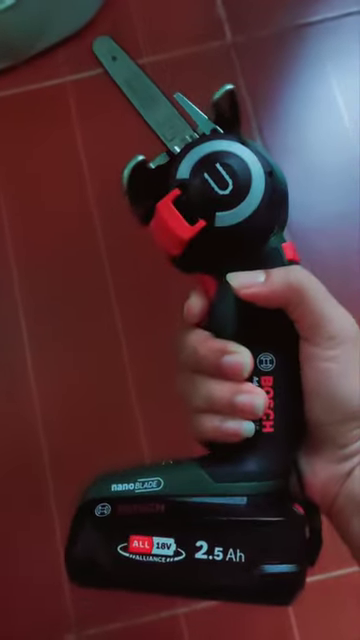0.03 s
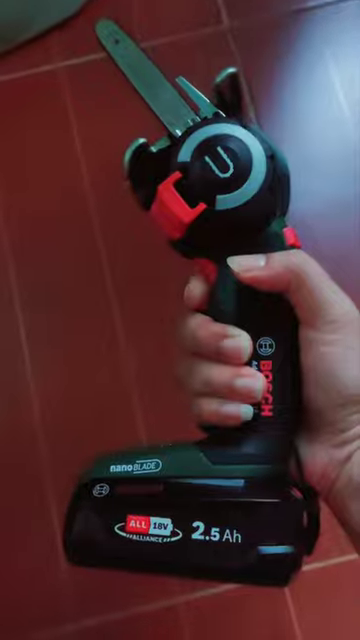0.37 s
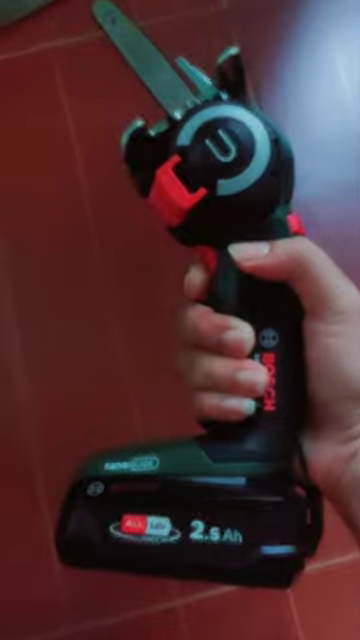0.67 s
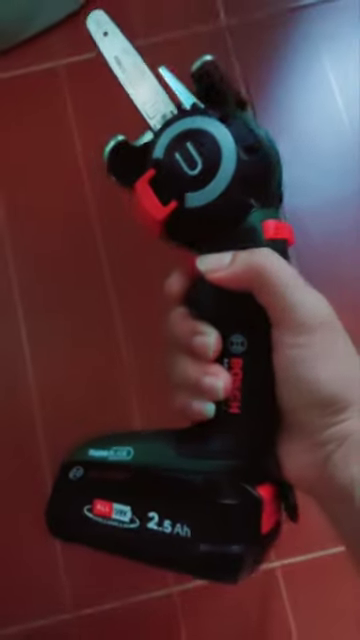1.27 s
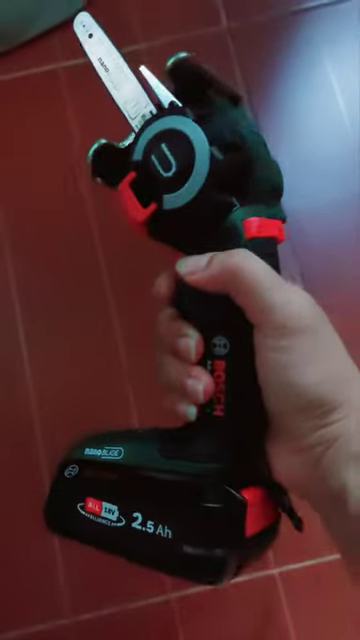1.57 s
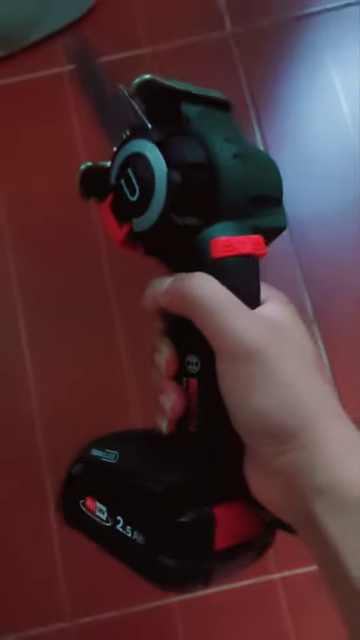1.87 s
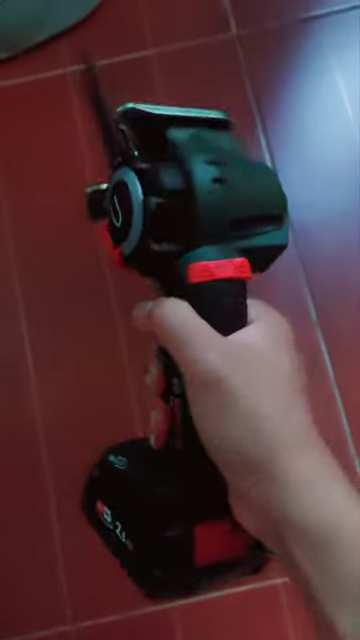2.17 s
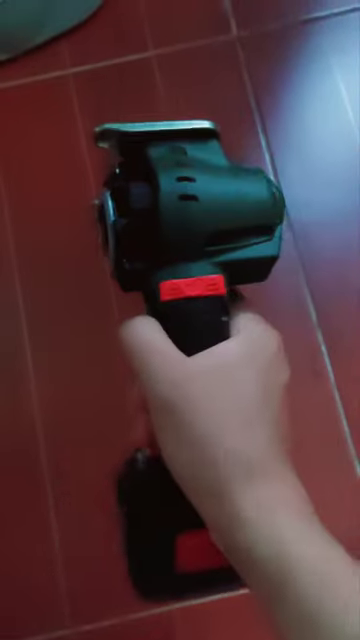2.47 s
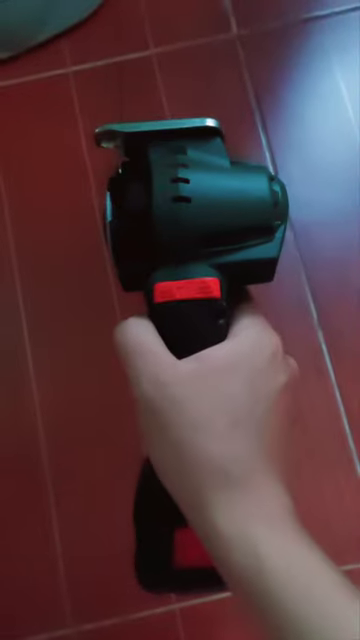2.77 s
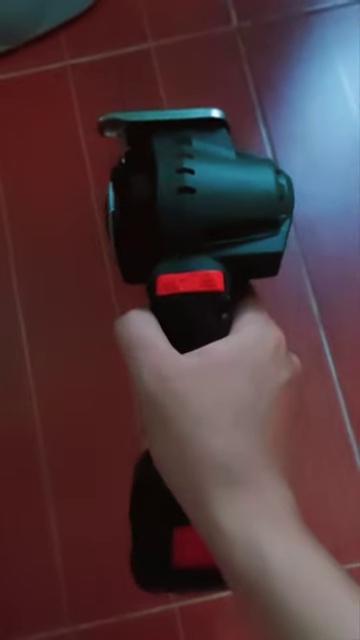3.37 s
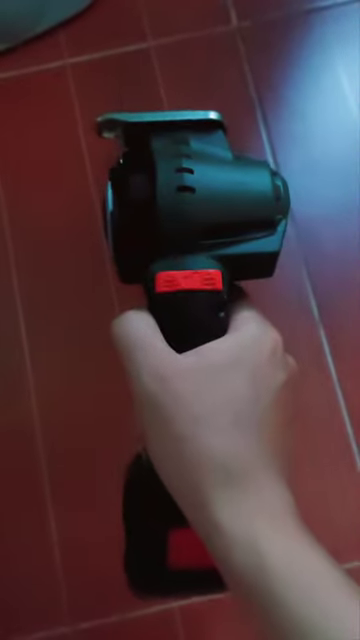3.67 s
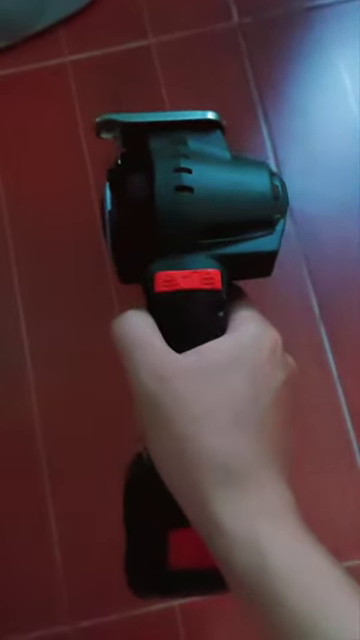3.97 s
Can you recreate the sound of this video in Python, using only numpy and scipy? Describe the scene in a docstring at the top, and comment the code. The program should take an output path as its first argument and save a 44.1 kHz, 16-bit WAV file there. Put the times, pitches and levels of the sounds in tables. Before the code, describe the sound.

A small cordless chain saw runs free from the start in a tiled room, a steady high whine with a hissing chain rattle. At about 2 seconds its tone turns slightly raspier while the speed holds. At about 3.6 seconds it stops abruptly with a sharp clack and a brief room echo. Fingers creak and thump softly on the microphone throughout, most around 2.5 seconds, continuing until 4 seconds.

```python
"""A steady whine and rattle: a small cordless chain saw runs free in a tiled room. The motor hums,
its pinion whines against a gear wheel, the housing rasps and the links clatter and hiss round the bar.
About two seconds in, the saw is turned in the hand, away from its blade side, and its colour shifts.
Near the end the trigger is let go and the brake stops it with a clack.
Close up, fingers creak and thump on the microphone's case throughout."""
import sys
import numpy as np
from scipy import signal
from scipy.fft import rfft, irfft
from scipy.io import wavfile
from scipy.ndimage import uniform_filter1d

SR = 44100
rng = np.random.default_rng(int(sys.argv[2]) if len(sys.argv) > 2 else 0)


def unload_audio(sound):
    """Save the sound as a 16-bit wav file, at the path given as the first command line argument."""
    columns = np.transpose(np.atleast_2d(sound))
    # keep every value between -1 and 1, then stretch to whole-number steps
    steps = np.round(np.clip(columns, -1, 1) * 32767)
    wavfile.write(sys.argv[1], SR, steps.astype(np.int16))


N = 176400
T = np.arange(N) / SR

MOTOR_HZ, PINION_TEETH, WHEEL_TEETH, LINKS_PER_TURN = 117.26, 7, 52, 13
TURN_FROM_S, TURN_TO_S, RELEASE_S, BRAKE_S = 1.85, 2.14, 3.605, 3.64
SPEED_WANDER, COAST_PER_S, FADE_DB_PER_S, STOP_DECAY_S = .0002, 0.53, 135, .006
WAVER_DB, STEREO_RAD, HUM_ROUGH_RAD, RASP_ROUGH_RAD = 1.2, 0.46, .4, 1.6
TOOTH_SPREAD_HZ, GEAR_ROUGH, PINION_WOBBLE, WHISTLE_HARMONIC = 29, .5, .35, 9
STRIKE_DECAY_LINKS, STRIKE_SCATTER_DB, HISS_WEIGHT, REPEAT_SHARE = 0.76, 4, 2.5, .087
CHAIN_SWING_DB, CHAIN_FLUTTER_DB = 0.67, .5
CREAK_ATTACK_S, CREAK_LOW_CUT_HZ, SLIPS_PER_S, SLIP_SCATTER_DB = 0.00041, 276, 170, 4
ROOM_T60_S, TREBLE_T60_S, CHAIN_SEND_DB, TONE_SEND_DB, CLACK_TRIM_DB = .46, .33, -7, -17, -1.5
FLOOR_DELAY_S, FLOOR_BLADE_DB, FLOOR_TURNED_DB = 0.0029, 1, -0.5
RIGHT_LAG_S, FLOOR_RIGHT_LAG_S, THUMP_LEFT_DB, TOP_HZ = 0.0002018, 0.000503, -14.5, 15750

# Fader ride on the running saw: time_s, gain_db
SAW_RIDE = [(0, 0.76), (.7, 0.3), (1.25, 1.1), (1.6, 0.85), (2.3, 0.5), (2.85, -1), (3.2, -0.04), (3.6, 0)]
# Motor hum, blade side on and once turned: shaft_harmonic, blade_db, turned_db
MOTOR_PARTIALS = [(4, -51, -52), (8, -51, -48.5), (12, -58.5, -66), (16, -63, -56.5), (20, -48, -60),
                  (21, -51, -49), (22, -59.5, -54), (23, -56, -55), (26, -74, -57), (29, -45.5, -63),
                  (30, -49, -102)]
# Hum of links meeting the sprocket: link_harmonic, blade_db, turned_db
LINK_PARTIALS = [(7, -57, -56), (9, -52, -54), (10, -56, -58), (11, -59, -58), (13, -52, -51)]
# Gear whine: tooth_harmonic, blade_db, turned_db, unevenness_rad, stereo_rad
GEAR_PARTIALS = [(1, -52.5, -54, .2, .8), (2, -42.2, -42, .15, .7), (4, -38.7, -40, .5, .45),
                 (5, -35, -47, .45, .25), (6, -52, -53, .6, 1), (7, -48, -43.5, .8, .5),
                 (8, -44.5, -46.5, .8, 1.2), (9, -41.5, -43.5, 1, .55), (10, -40.5, -49, 1, 1.15),
                 (11, -43.5, -54, 1.1, .3), (12, -46, -56, 1.2, 1.1), (15, -48, -44.5, 1.4, .6),
                 (19, -48, -48, 2, .6)]
# Throb of the off-centre wheel: tooth_harmonic, beats_per_turn, depth_db, peak_turns
WHEEL_THROB = [(2, 1, 4.2, .62), (2, 2, 3.8, .21), (2, 3, 1.7, .3), (2, 6, 1.5, .07), (4, 1, 3.4, .1),
               (4, 2, 2.6, .1), (5, 2, .8, .46)]
# One high gear partial whistles up as the saw tilts: time_s, gain_db
WHISTLE_RIDE = [(0, 1.5), (1, 2), (1.15, -3), (1.5, -2), (1.7, 3), (2.1, 3), (2.3, -.5), (3.6, -1)]
# Rasp of the housing: pitch_hz, flutter_per_s, blade_db, turned_db, burst_share
RASP_BANDS = [(1775, 90, -54, -45.5, 1), (4030, 200, -49, -44, .6)]
# Tight spots of the wheel: beats_per_turn, depth_db, peak_turns
WHEEL_TIGHT_SPOTS = [(1, 2, .22), (4, 4.5, .24)]
# Ring of chain, bar and housing: frequency_hz, density_db
CHAIN_SPECTRUM = [(30, -110), (200, -94.5), (400, -77.5), (900, -73), (1150, -75.5), (1380, -75),
                  (1600, -68.5), (1800, -70), (2150, -71), (2600, -66), (2850, -69.5), (3350, -62.5),
                  (3700, -66.5), (4230, -64.5), (4600, -71), (5200, -72), (6300, -71.5), (7000, -67),
                  (8500, -71), (9450, -73.5), (10200, -78), (10750, -67), (11600, -65.5), (12700, -63),
                  (14200, -68.5), (15600, -65)]
# EQ on that ring once the housing faces the listener: frequency_hz, gain_db
TURNED_EQ = [(500, -1.5), (1700, 2), (2150, -2.5), (2700, 5), (3150, 3.5), (3600, -4), (4000, -2),
             (4280, -5), (4800, 1), (6200, 0), (7600, 0.5), (8600, -1.5), (10000, -3), (12300, -0.5),
             (15600, -2.5)]
# Quiet room tone: frequency_hz, density_db
AIR_SPECTRUM = [(20, -104), (70, -98), (250, -95), (450, -80), (1500, -90), (4000, -101), (8000, -115),
                (15000, -119)]
# Modes of the microphone's case: pitch_hz, t60_s, relative_db
CASE_MODES = [(343, 0.021, -10.5), (403.6, 0.031, 3.5), (502, 0.023, 6.5), (672, 0.011, 3.5),
              (870, 0.016, -2.5), (1516, 0.016, -4.5)]
# Distinct finger creaks: start_s, left_db, right_db
FINGER_CREAKS = [(0.02, -21, -43), (.135, -25, -49), (.165, -18.5, -44), (0.264, -24, -45),
                 (0.351, -16.5, -41), (.69, -23.5, -44), (.745, -22.5, -38), (0.776, -25, -45),
                 (1.03, -21.5, -28), (1.274, -22.5, -47), (1.321, -22.5, -30), (1.475, -17.5, -42),
                 (1.531, -18.5, -45), (1.745, -20, -41), (1.893, -41, -47), (2.085, -26, -40),
                 (2.297, -16, -28), (2.34, -20, -40), (2.42, -19, -40), (2.434, -17.5, -33),
                 (2.475, -19.5, -40), (2.508, -20, -38), (2.563, -16, -28), (2.572, -23, -32),
                 (2.649, -18.5, -42), (2.93, -33, -22.5), (3.021, -24.5, -42), (3.175, -24, -41),
                 (3.645, -22, -43), (3.698, -30, -40), (3.724, -28.5, -48), (3.737, -33, -46.5),
                 (3.777, -24.5, -57.5), (3.791, -27, -52), (3.808, -20.5, -45), (3.841, -27, -57),
                 (3.914, -32.5, -59), (3.93, -34.5, -45)]
# Bed of tiny slips between them: time_s, level_db
GRIP_RIDE = [(0, -32), (.8, -31.5), (1.15, -41), (1.5, -31), (2.3, -30), (2.7, -31), (3.4, -34.5),
             (3.75, -40.5), (3.88, -41), (4, -37)]
# Rumble of the hand: time_s, level_db
RUMBLE_RIDE = [(0, -48.5), (.5, -49.5), (.9, -52.5), (1.2, -47.5), (1.38, -63), (1.6, -49), (1.8, -54.5),
               (2.05, -61), (2.3, -40), (2.75, -47), (3.3, -53), (3.7, -44), (4, -69)]
# Soft thumps of the hand: centre_s, level_db, half_width_s
HAND_THUMPS = [(0.196, -45, 0.11), (0.352, -31, 0.015), (0.724, -38, 0.013), (0.834, -41, 0.057),
               (1.036, -38.5, 0.047), (2.303, -34, 0.014), (2.433, -35, 0.036), (2.513, -30.5, 0.019),
               (2.571, -22, 0.012), (2.94, -38, 0.02), (3.025, -36.5, .015), (3.168, -37.5, 0.028),
               (3.423, -47, 0.043)]
# Dull colour of rumble and thumps: frequency_hz, relative_db
THUMP_SPECTRUM = [(15, -43), (30, -13), (50, -0.5), (78, 5), (120, -1), (220, -3), (400, -3.5), (900, -32),
                  (4000, -84)]
# Knocks of the brake: start_s, strength_db, decay_s
BRAKE_KNOCKS = [(3.6385, 15, .0006), (3.640, 14.5, .0006), (3.643, -2, .004), (3.6485, 2.5, .002)]
# Colour of those knocks: frequency_hz, density_db
BRAKE_SPECTRUM = [(60, -88), (250, -80), (430, -64), (900, -69), (2000, -64), (3200, -61), (5300, -67),
                  (7000, -76), (15000, -90)]


def amp(db):
    """Decibels to gain."""
    return 10 ** (np.asarray(db) / 20)


def ride(rows):
    """A fader move: straight lines through rows of time_s, value."""
    return np.interp(T, *np.array(rows).T)


def colour(x, rows):
    """EQ that gives unit white noise the spectrum in rows of frequency_hz, density_db."""
    hz, db = np.array(rows).T
    bins_hz = np.arange(N + 1) * SR / (2 * N)
    gain = amp(np.interp(np.log(bins_hz + 1), np.log(hz), db))
    return irfft(rfft(x, 2 * N) * gain)[..., :N] * np.sqrt(SR / 2)


def drift(per_s):
    """Smooth random drift with a spread of one."""
    hold = max(int(SR / per_s), 2)
    steps = np.repeat(rng.standard_normal(N // hold + 2), hold)
    smooth = uniform_filter1d(steps, hold)[:N]
    return smooth / smooth.std()


def delay(x, lag_s):
    """The same sound, lag_s later."""
    return irfft(rfft(x, 2 * N) * np.exp(-1j * np.pi * np.arange(N + 1) * SR / N * lag_s))[:N]


def crossfade(blade, turned_away, turned):
    """Blend from the blade-side value to the turned one as turned goes from 0 to 1."""
    return blade + (turned_away - blade) * turned


def tone(phase, db, stereo_rad=STEREO_RAD):
    """One stereo partial; it wavers as the saw moves in the hand."""
    pair = [amp(db + WAVER_DB * drift(4.03)) * np.sin(phase + side * stereo_rad + 0.33 * drift(2.96))
            for side in (1, -1)]
    return np.sqrt(2) * np.array(pair)


def hum(cycles, partials, turned):
    """Slightly unsteady partials locked to the motor shaft or the passing links."""
    out = 0
    for harmonic, blade_db, turned_db in partials:
        phase = 2 * np.pi * (harmonic * cycles + rng.random()) + HUM_ROUGH_RAD * drift(45)
        out += tone(phase, crossfade(blade_db, turned_db, turned))
    return out


def tooth_errors(wheel, count=20):
    """Unevenness of the teeth that comes back with every turn of the wheel."""
    orders = np.arange(1, count + 1)
    weights = 1 / np.hypot(1, orders * MOTOR_HZ * PINION_TEETH / WHEEL_TEETH / TOOTH_SPREAD_HZ)
    place = np.linspace(0, 1, 512)
    shape = weights @ np.cos(2 * np.pi * (orders[:, None] * place + rng.random((count, 1))))
    return np.interp(wheel % 1, place, shape / shape.std())


def gear_whine(shaft, wheel, turned):
    """Meshing teeth whine and throb with the wheel, smeared by uneven teeth and a wobbling pinion."""
    out = 0
    for harmonic, blade_db, turned_db, uneven_rad, stereo_rad in GEAR_PARTIALS:
        error = tooth_errors(wheel) + GEAR_ROUGH * drift(150) + PINION_WOBBLE * np.sin(2 * np.pi * shaft)
        phase = 2 * np.pi * harmonic * PINION_TEETH * shaft + uneven_rad * error
        throb_db = sum(db * np.cos(2 * np.pi * beats * (wheel - peak))
                       for partial, beats, db, peak in WHEEL_THROB if partial == harmonic)
        whistle_db = ride(WHISTLE_RIDE) if harmonic == WHISTLE_HARMONIC else 0
        out += tone(phase, crossfade(blade_db, turned_db, turned) + throb_db + whistle_db, stereo_rad)
    return out


def housing_rasp(wheel, turned):
    """Tight spots of the wheel make the housing rasp in short rough bursts."""
    burst_db = sum(db * np.cos(2 * np.pi * beats * (wheel - at)) for beats, db, at in WHEEL_TIGHT_SPOTS)
    out = 0
    for hz, flutter_per_s, blade_db, turned_db, share in RASP_BANDS:
        phase = 2 * np.pi * hz * T + RASP_ROUGH_RAD * drift(flutter_per_s)
        out += tone(phase, crossfade(blade_db, turned_db, turned) + share * burst_db)
    return out


def chain_rattle(wheel, turned):
    """Each link strikes the sprocket over a sliding hiss; part of the grit loops with each turn."""
    links = wheel * LINKS_PER_TURN
    accents = amp(STRIKE_SCATTER_DB * rng.standard_normal(N // 100))
    strikes = np.exp(-(links % 1) / STRIKE_DECAY_LINKS) * accents[links.astype(int)]
    swing_db = CHAIN_SWING_DB * np.cos(4 * np.pi * wheel) + CHAIN_FLUTTER_DB * drift(25.28)
    force = (HISS_WEIGHT + strikes) * amp(swing_db)
    turn_samples = int(SR * WHEEL_TEETH / PINION_TEETH / MOTOR_HZ)
    loop = rng.standard_normal(turn_samples)[(wheel % 1 * turn_samples).astype(int)]
    grit = np.sqrt(REPEAT_SHARE) * loop + np.sqrt(1 - REPEAT_SHARE) * rng.standard_normal(N)
    rattle = colour(grit * force / np.sqrt(np.mean(force ** 2)), CHAIN_SPECTRUM)
    return crossfade(rattle, colour(rattle, TURNED_EQ) / np.sqrt(SR / 2), turned)


def tiled_room(x, send_db):
    """Diffuse stereo tail off hard walls, shorter in the treble."""
    t, tail = T[:SR], 0
    for band, t60_s in (("low", ROOM_T60_S), ("high", TREBLE_T60_S)):
        crossover = signal.butter(2, 5000, band, fs=SR, output="sos")
        tail += signal.sosfilt(crossover, rng.standard_normal((2, SR))) * amp(-60 * t / t60_s)
    tail *= t > .006  # pre-delay
    tail /= np.sqrt((tail ** 2).sum(1, keepdims=True))
    return amp(send_db) * signal.fftconvolve(x[None], tail, axes=1)[:, :N]


def creak(size):
    """One slip of skin rings the case, a little differently each time."""
    t, ring = T[:size], 0
    for hz, t60_s, db in CASE_MODES:
        envelope = amp(db + 2 * rng.standard_normal() - 60 * t / t60_s)
        detune = 1 + 0.068 * rng.standard_normal()
        ring += envelope * np.sin(2 * np.pi * hz * detune * t)
    ring *= 1 - np.exp(-t / CREAK_ATTACK_S)
    return ring / np.abs(ring).max()


def finger_creaks():
    """The grip slips on the case: distinct creaks, mostly left, over a bed of tiny ones hard left."""
    out, size = np.zeros((2, 2 * N)), SR // 20
    for start_s, left_db, right_db in FINGER_CREAKS:
        i = int(start_s * SR)
        out[:, i:i + size] += amp([[left_db], [right_db]]) * creak(size)
    slips = (rng.random(N) < SLIPS_PER_S / SR) * rng.choice([-1, 1], N)
    slips = slips * amp(ride(GRIP_RIDE) + SLIP_SCATTER_DB * np.clip(rng.standard_normal(N), -2, 2))
    for i in np.flatnonzero(slips):
        out[0, i:i + size] += slips[i] * creak(size)
    return signal.sosfilt(signal.butter(6, CREAK_LOW_CUT_HZ, "high", fs=SR, output="sos"), out[:, :N])


def hand_thumps():
    """The hand presses on the case: dull thumps over a restless rumble, mostly right."""
    thumps = sum(amp(db) * np.exp(-((T - at_s) / width_s) ** 2) for at_s, db, width_s in HAND_THUMPS)
    rumble = amp(ride(RUMBLE_RIDE) + 5.1 * drift(9))
    thud = colour(rng.standard_normal((2, N)), THUMP_SPECTRUM)
    return (thumps + rumble) * thud / thud.std() * amp([[THUMP_LEFT_DB], [0]])


def brake_clack():
    """The slack in gears and chain closes in a few quick knocks."""
    knocks = sum(amp(db) * np.exp(-np.abs(T - start_s) / decay_s) * (T >= start_s)
                 for start_s, db, decay_s in BRAKE_KNOCKS)
    return colour(knocks * rng.standard_normal(N), BRAKE_SPECTRUM)


def scene():
    """The mix: the saw, its bounce off the floor, the room and the hand up close."""
    coast_s = np.maximum(T - RELEASE_S, 0)
    braking = np.exp(-np.maximum(T - BRAKE_S, 0) / STOP_DECAY_S)
    shaft_hz = MOTOR_HZ * (1 + SPEED_WANDER * drift(8)) * np.exp(-COAST_PER_S * coast_s) * braking
    shaft = np.cumsum(shaft_hz) / SR  # shaft and wheel count turns
    wheel = shaft * PINION_TEETH / WHEEL_TEETH
    turned = np.clip((T - TURN_FROM_S) / (TURN_TO_S - TURN_FROM_S), 0, 1)
    fader = amp(ride(SAW_RIDE) - FADE_DB_PER_S * coast_s) * braking
    tones = gear_whine(shaft, wheel, turned) + housing_rasp(wheel, turned)
    tones += hum(shaft, MOTOR_PARTIALS, turned) + hum(wheel * LINKS_PER_TURN, LINK_PARTIALS, turned)
    tones *= fader
    rattle, clack = fader * chain_rattle(wheel, turned), brake_clack()
    clatter = rattle + clack
    far_run = fader * chain_rattle(wheel, turned)  # the chain's far run is heard off the floor
    floor_gain = amp(crossfade(FLOOR_BLADE_DB, FLOOR_TURNED_DB, turned))
    bounce = floor_gain * (far_run + delay(clack, FLOOR_DELAY_S))
    right = delay(clatter, RIGHT_LAG_S) + delay(bounce, FLOOR_RIGHT_LAG_S)
    near = np.array([clatter + bounce, right]) / np.hypot(1, floor_gain)
    reverb = tiled_room(tones[0], TONE_SEND_DB)
    reverb += tiled_room(rattle + amp(CLACK_TRIM_DB) * clack, CHAIN_SEND_DB)
    handling = finger_creaks() + hand_thumps()
    air = colour(rng.standard_normal((2, N)), AIR_SPECTRUM)
    return tones + near + reverb + handling + air


def record(dry):
    """A steep high cut takes the very top off the mix."""
    return signal.sosfilt(signal.ellip(12, .1, 90, TOP_HZ, fs=SR, output="sos"), dry)


dry = scene()
out = record(dry)
unload_audio(out)
```